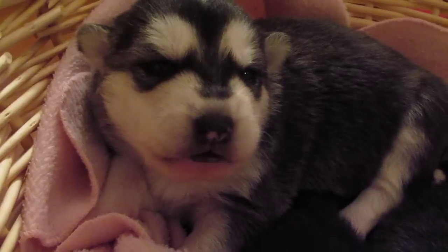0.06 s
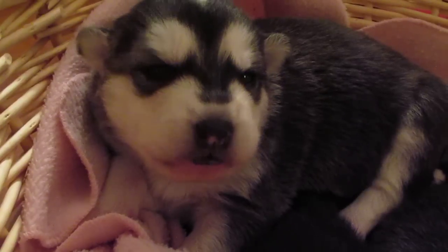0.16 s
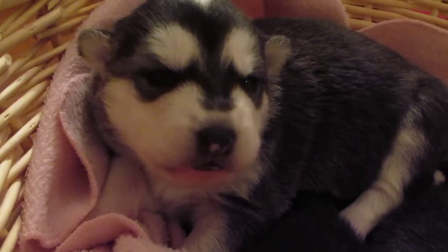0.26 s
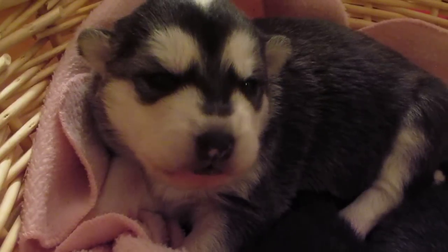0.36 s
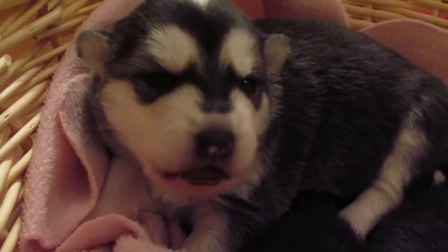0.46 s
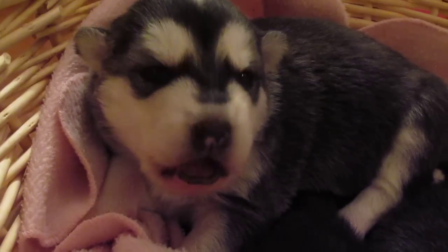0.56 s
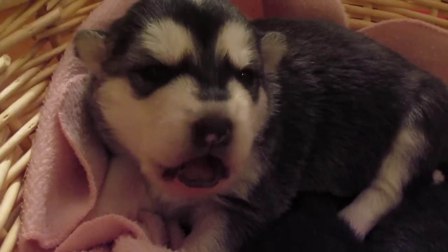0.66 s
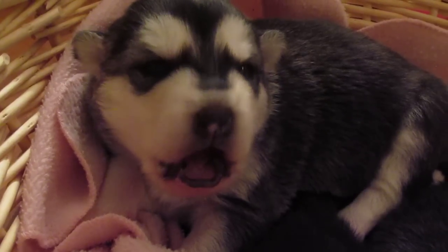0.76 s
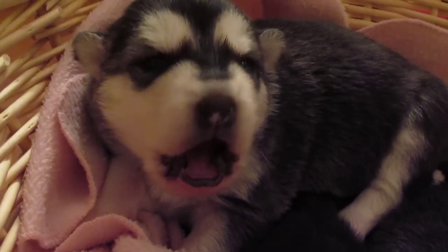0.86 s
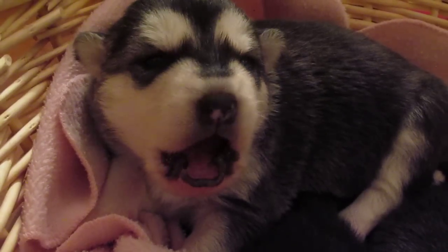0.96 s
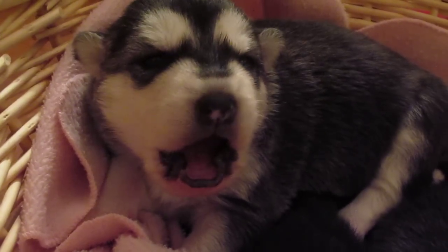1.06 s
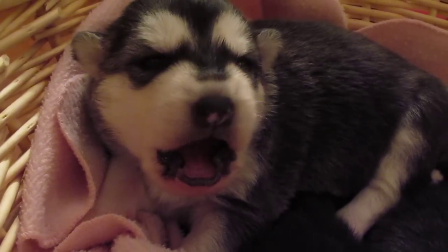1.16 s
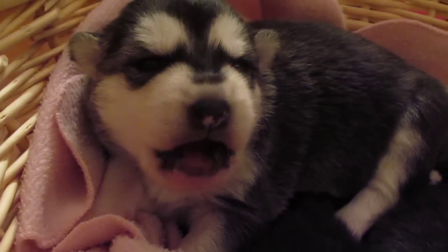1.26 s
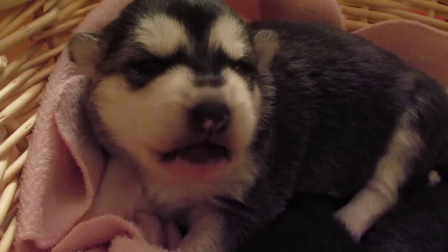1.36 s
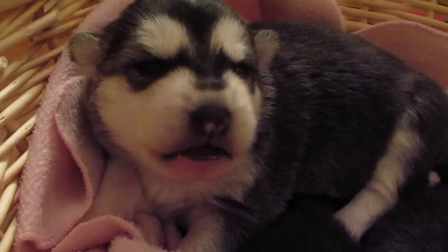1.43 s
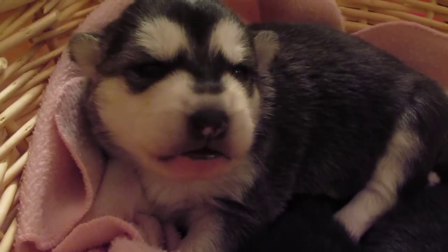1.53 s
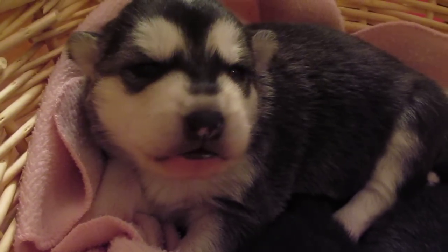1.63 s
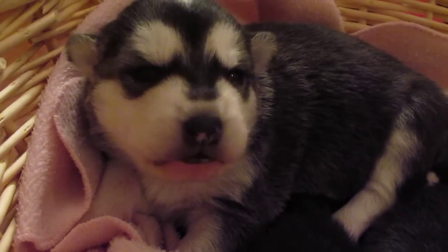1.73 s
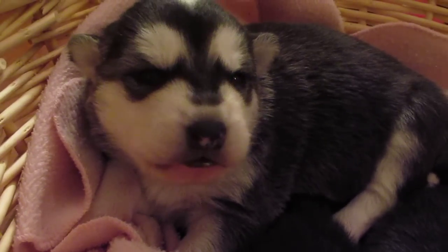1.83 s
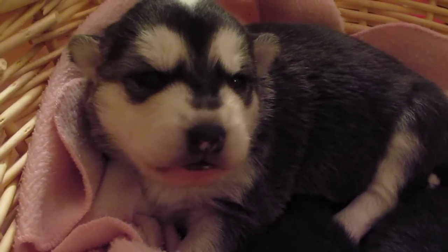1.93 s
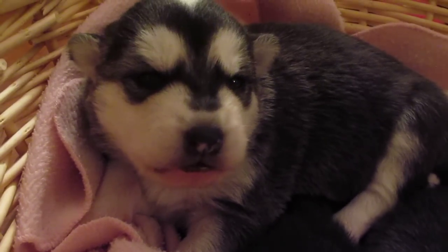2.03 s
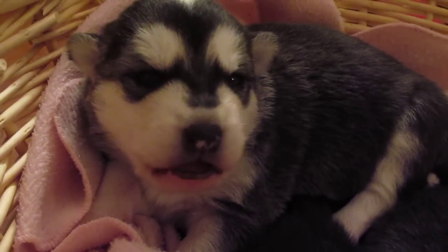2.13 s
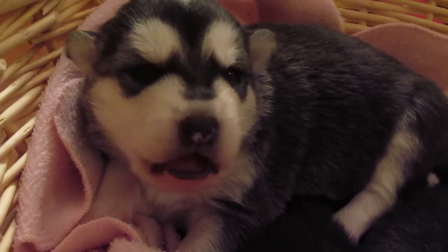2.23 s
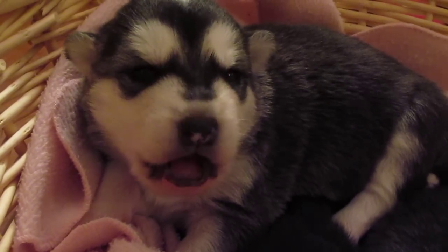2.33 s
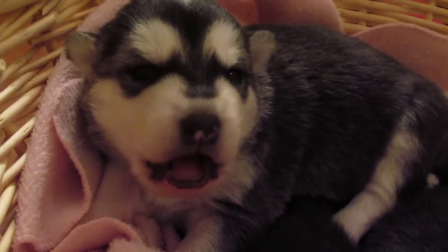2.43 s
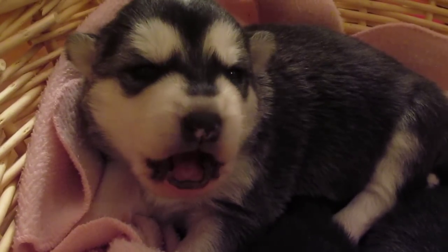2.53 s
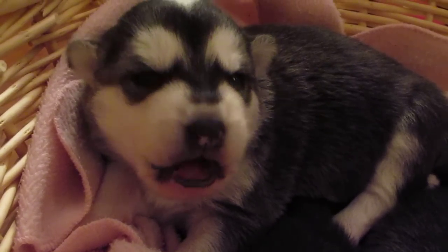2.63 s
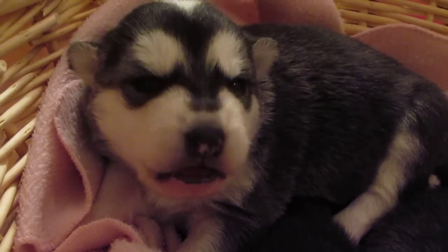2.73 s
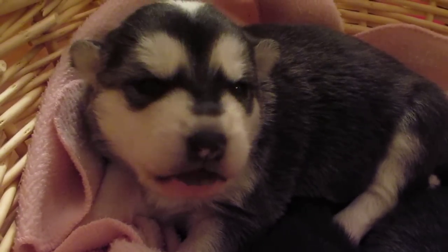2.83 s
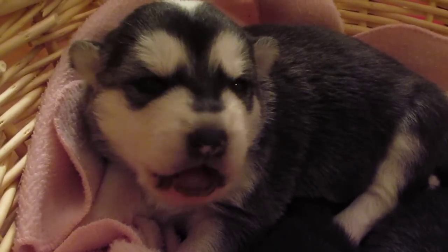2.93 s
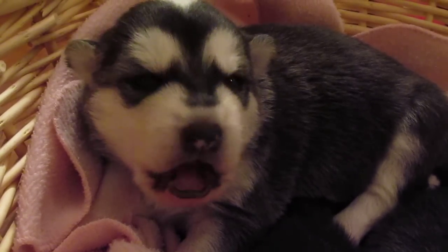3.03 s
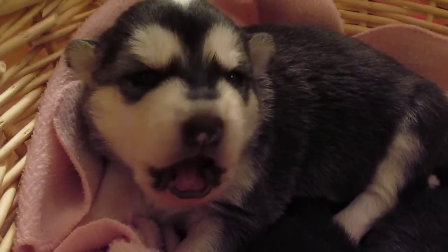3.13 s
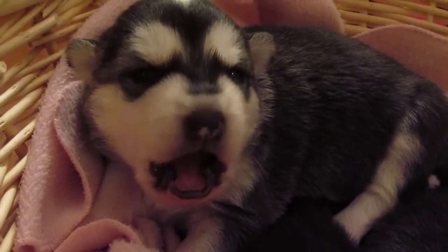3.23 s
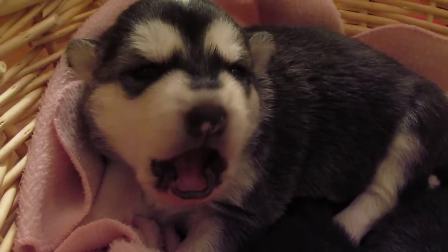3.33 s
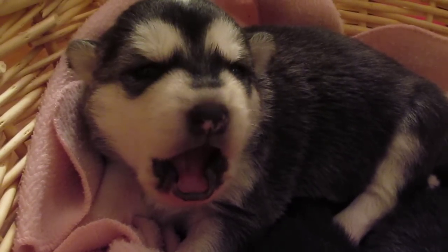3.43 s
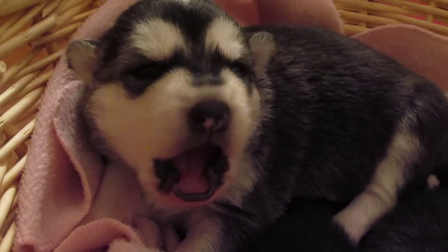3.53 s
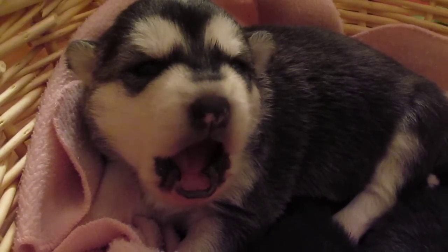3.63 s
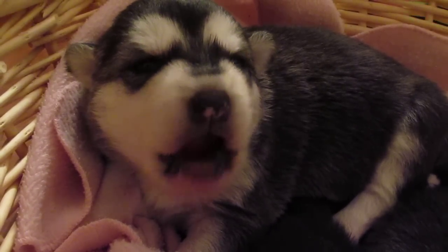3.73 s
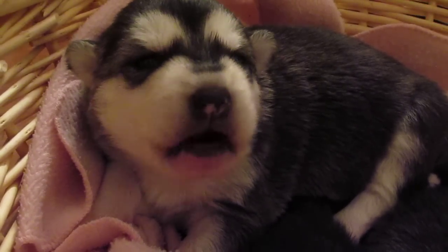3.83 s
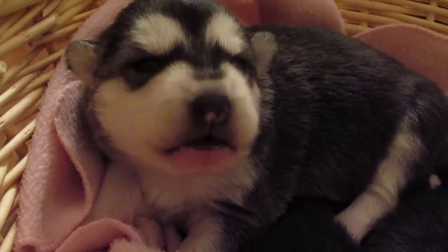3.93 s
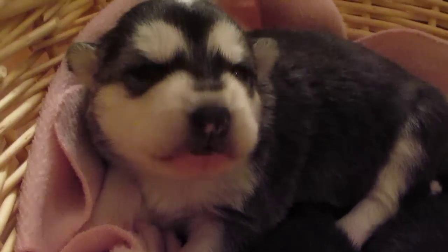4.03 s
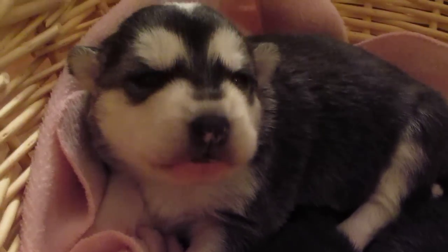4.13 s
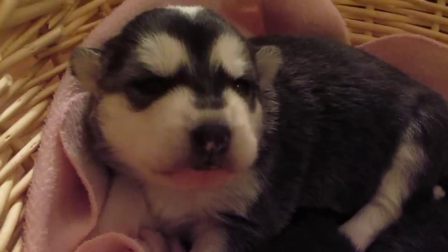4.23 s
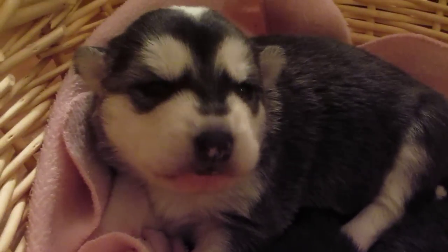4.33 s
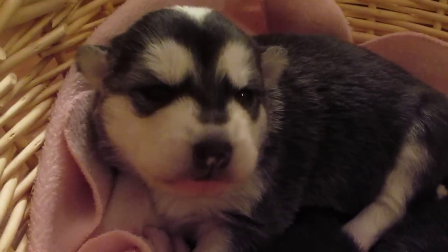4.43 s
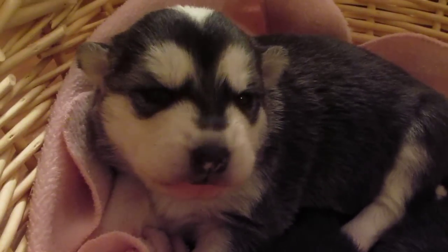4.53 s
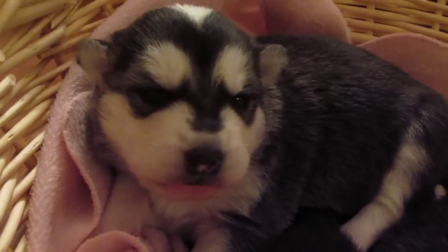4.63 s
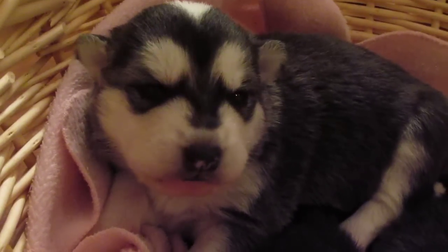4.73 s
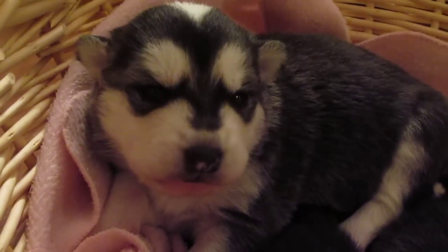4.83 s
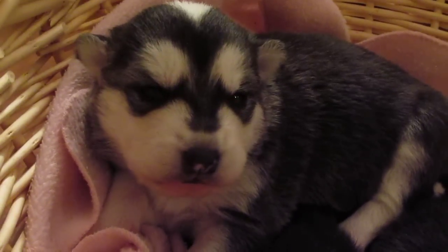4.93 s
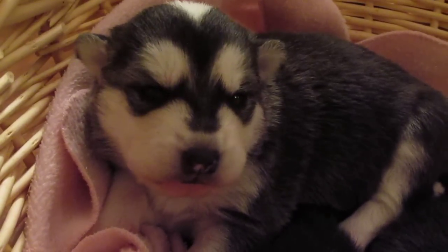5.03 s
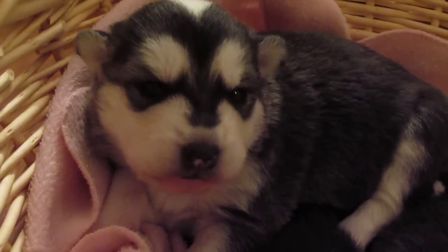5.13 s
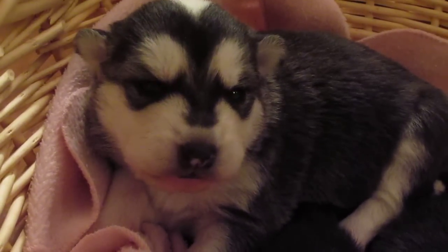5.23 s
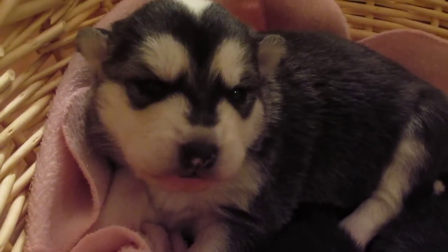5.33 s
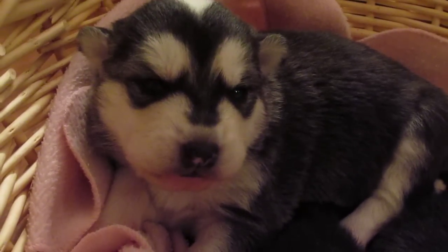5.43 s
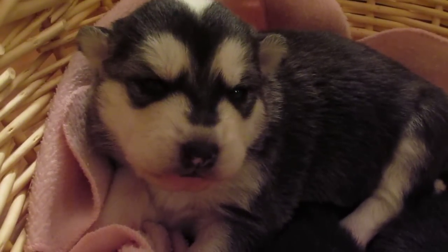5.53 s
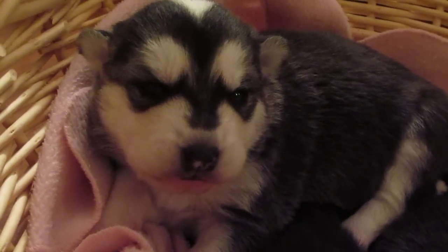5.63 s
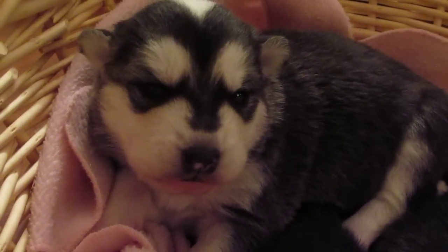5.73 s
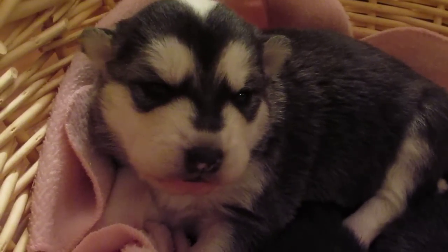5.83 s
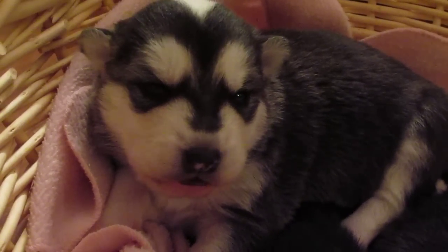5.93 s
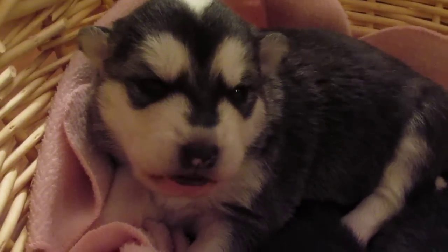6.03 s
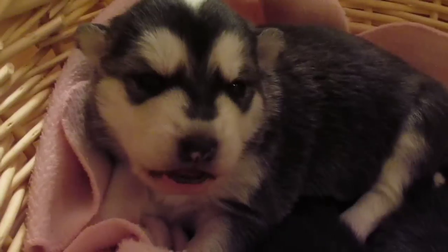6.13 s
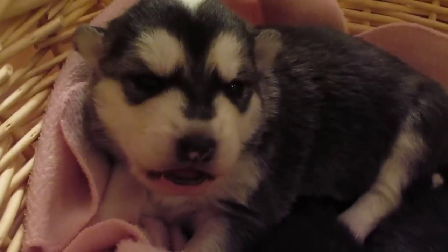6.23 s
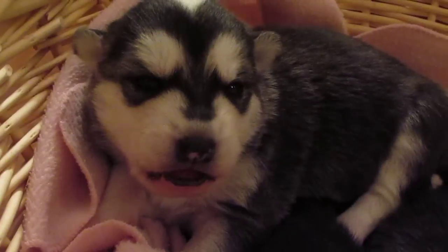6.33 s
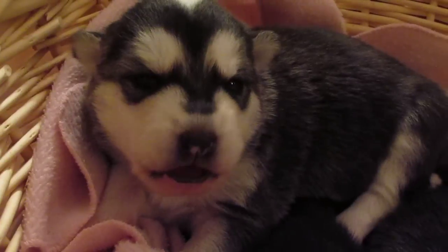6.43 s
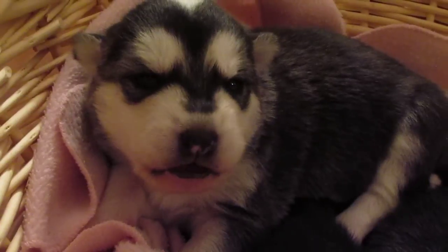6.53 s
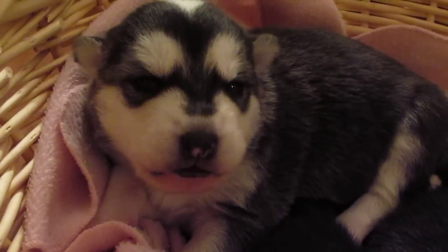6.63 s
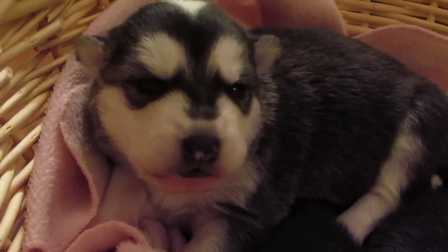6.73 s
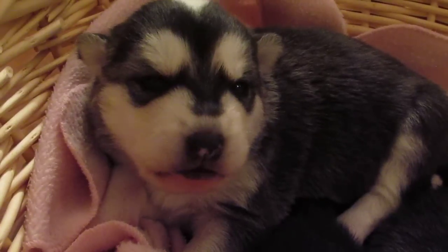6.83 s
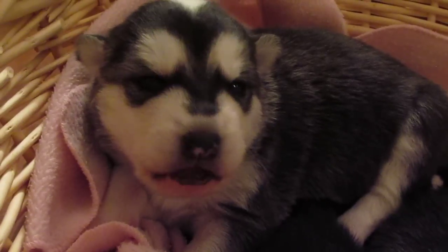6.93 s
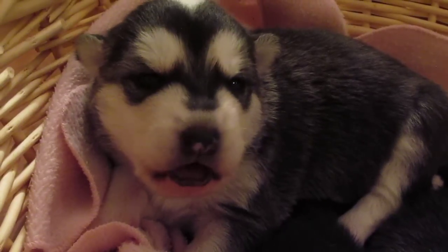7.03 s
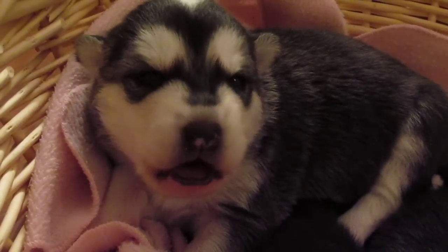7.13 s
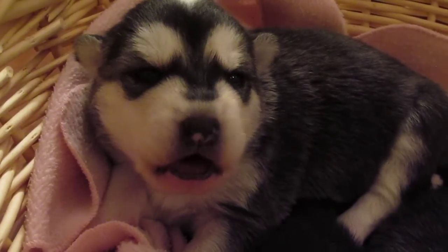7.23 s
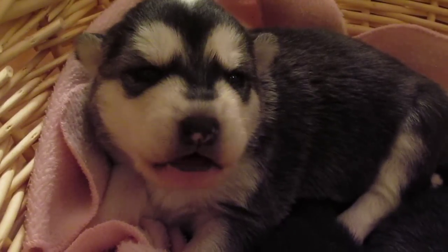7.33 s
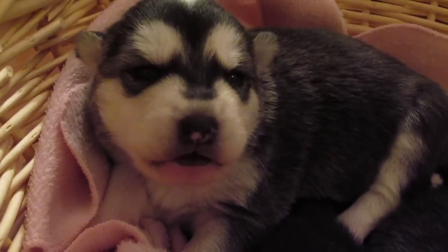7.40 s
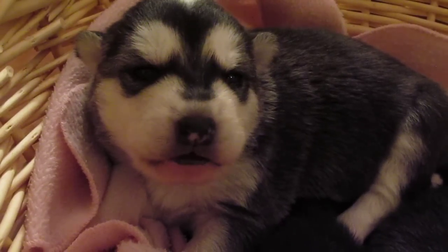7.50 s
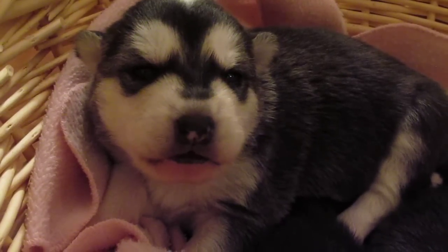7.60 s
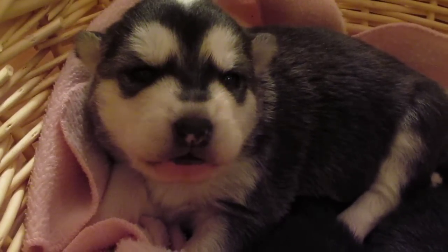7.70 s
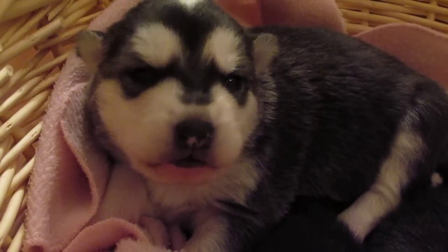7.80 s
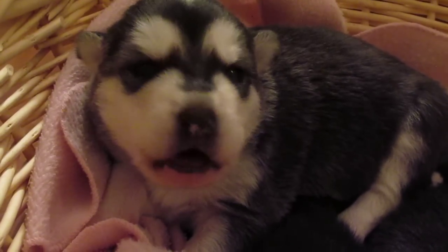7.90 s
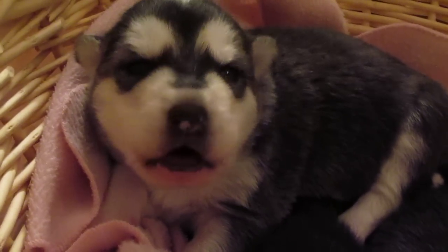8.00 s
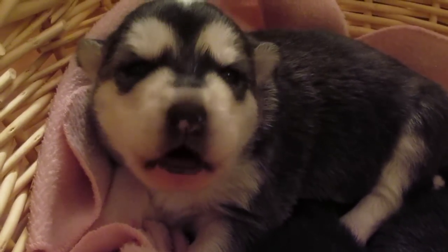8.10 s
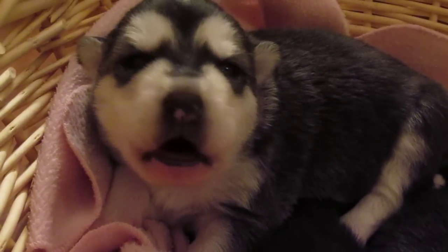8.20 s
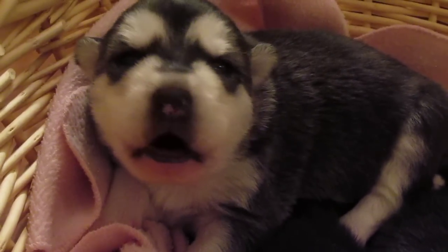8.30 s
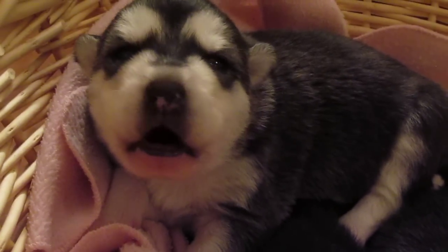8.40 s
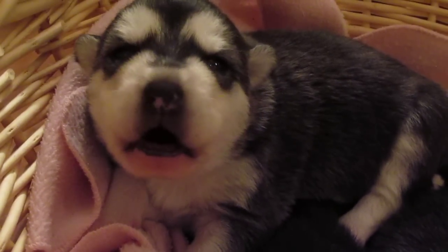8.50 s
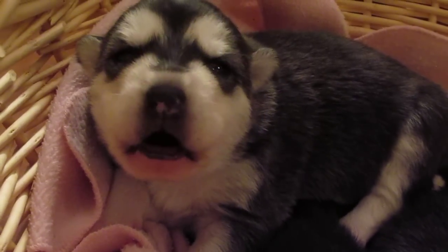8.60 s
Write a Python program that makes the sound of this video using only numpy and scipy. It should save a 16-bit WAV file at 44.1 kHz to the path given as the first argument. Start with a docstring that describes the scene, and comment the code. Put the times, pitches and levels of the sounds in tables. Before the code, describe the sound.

A very young puppy cries close to the microphone in a small, quiet furnished room, with soft air and a faint low drone. At 0 s the rasping tail of a cry falls away over a faint descending belly whine. A long wail from 0.4 to 1.7 s starts rough, arches high, then sinks and frays. A tiny thin squeak at 1.9 and a lip click at 2.0 lead to a shorter wail, 2.0-2.6. After another click, the highest, steadiest wail runs 2.8-4.2, dropping steeply near its end, with bubbling belly gurgles around 3.2. Faint croaky whimpers come at 4.5-4.7, and a low, slightly stronger one at 5.0-5.6. Wails return at 5.8-6.6 and 6.8-7.6, a small gurgle between at the second's start, while the drone swells around 6.5 and sinks. A click at 7.7 precedes a purer, more closed-mouthed cry from 7.8, cut off at 8.7.

```python
"""A young puppy in a wicker basket wails close to the microphone, in a small quiet room with a faint low drone.
It opens on the rasping end of a cry over a faint falling belly whine, then come long wails, a tiny squeak and lip
clicks, with gurgles under the third wail; short, low whimpers follow, and more wails as the drone swells and sinks.
Jittered fold pulses and hiss pass through a jaw-blended tract, rasping where the folds are slack; clicks are noise
bursts; gurgles, whine and squeak are sines; shaped noise makes the air and drone."""
import sys
import numpy as np
from scipy import signal
from scipy.fft import rfft, irfft, next_fast_len
from scipy.io import wavfile
from scipy.ndimage import uniform_filter1d, map_coordinates

SR = 44100
rng = np.random.default_rng(int(sys.argv[2]) if len(sys.argv) > 2 else 0)


def wav_out(sig):
    """Save sig, one row per channel (or a flat mono array), as 16-bit PCM at SR to the path in sys.argv[1]."""
    wavfile.write(sys.argv[1], SR, np.round(np.clip(np.atleast_2d(sig).T, -1, 1) * 32767).astype(np.int16))


N = 381906


def amp(db):
    """Decibels to gain."""
    return 10 ** (np.asarray(db) / 20)


def unit(x):
    """Scale to rms 1."""
    return x / np.sqrt(np.mean(x ** 2) + 1e-20)


def ramp(x):
    """Hold within 0 and 1."""
    return np.clip(x, 0, 1)


def bell(x, centre, width):
    """1 at the centre, falling away on both sides."""
    return np.exp(-((x - centre) / width) ** 2)


def along(points, hz):
    """(Hz, value) points read on a log frequency axis."""
    f, v = np.transpose(points)
    return np.interp(np.log(hz + 1), np.log(f + 1), v)


def curves(rows, t):
    """Each column after the time, read at the times t."""
    s, *cols = np.transpose(rows)
    return [np.interp(t, s, c) for c in cols]


def wobble(t, rate):
    """A smooth random curve, rate knots a second."""
    knots = rng.standard_normal(int((t[-1] - t[0]) * rate) + 4)
    return map_coordinates(knots, [(t - t[0]) * rate])


def filtered(x, response):
    """x times a response of frequency."""
    size = next_fast_len(x.shape[-1] + 8192)
    spectrum = rfft(x, size) * response(np.fft.rfftfreq(size, 1 / SR))
    return irfft(spectrum, size)[..., :x.shape[-1]]


def noise(spectrum, channels=2):
    """Coloured noise of rms 1."""
    white = rng.standard_normal((channels, N))
    return unit(filtered(white, lambda hz: amp(along(spectrum, hz))))


# colour of the still room air: pitch_hz, relative_level_db
AIR_COLOUR = [(20, -11.5), (45, -17.5), (90, -12), (200, -15), (500, -18), (2000, -26), (5000, -33),
              (13000, -40.5), (15500, -61)]
# swell of the low drone in the house: time_s, level_db
DRONE_SWELL = [(0, -73.5), (3.8, -79.5), (4.6, -65.5), (6.5, -53.5), (7.3, -65.5), (8.66, -62)]


def background(air_db=-57.5, side_db=-6):
    """Still room air, partly opposed between the ears, over a low centred drone of narrow noise."""
    mid, side = noise(AIR_COLOUR)
    swell_db, = curves(DRONE_SWELL, np.arange(N) / SR)
    drone_colour = [(50, -33), (75, -29), (86, 0.5), (100, -18.0), (150, -11), (300, -41.5)]
    drone = amp(swell_db) * noise(drone_colour, channels=1)[0]
    air = mid + amp(side_db) * np.array([side, -side])
    return amp(air_db) * air + drone


# how long the room rings: pitch_hz, t60_s
ROOM_DECAY = [(200, .4), (1800, .52), (5000, .3), (12000, .2)]


def room(x):
    """A noise tail that decays at its own rate in each band, the treble fastest."""
    hz, t, z = signal.stft(rng.standard_normal((2, SR // 2)), SR, nperseg=256)
    decay_db = -60 * t / along(ROOM_DECAY, hz)[:, None]
    tail = signal.istft(z * amp(decay_db), SR, nperseg=256)[1]
    return signal.fftconvolve(x[None], tail / np.linalg.norm(tail[0]), axes=1)[:, :N]


def basket(x, near_db=-19, apart_db=-19):
    """Wicker and blanket scatter the sound within milliseconds, a little differently to each microphone."""
    t = np.arange(SR // 40) / SR
    envelope = np.exp(-t / .007) * (1 - np.exp(-t / .001))
    scatter = rng.standard_normal((2, len(t))) * envelope
    shared, side = scatter / np.linalg.norm(scatter, axis=1, keepdims=True)
    side = filtered(side, lambda hz: amp(along([(400, -41.5), (1500, 5.0), (9000, 9.5)], hz)))
    paths = amp(near_db) * shared + amp(apart_db) * np.array([side, -side])
    return signal.fftconvolve(x[None], paths, axes=1)[:, :N]


# tones of the tiny squeak between two cries: pitch_hz, level_db
SQUEAK_TONES = [(1850, -54.5), (3050, -66), (4600, -66), (6880, -65.5)]


def squeak(at_s=1.895, width_s=0.02, waver=.006):
    """A few thin sine tones waver, swell and fade together."""
    t = np.arange(N) / SR
    clock = np.cumsum(1 + waver * wobble(t, rate=150)) / SR
    tones = sum(amp(db) * np.sin(2 * np.pi * hz * clock) for hz, db in SQUEAK_TONES)
    return bell(t, at_s, width_s) * tones


# belly gurgles: start_s, pitch_hz, level_db, t60_s
BELLY_GURGLES = [(2.849, 127.4, -44.5, 0.55), (2.86, 211, -42, 0.27), (3.174, 437, -27.5, 0.15),
                 (3.193, 535, -29, 0.3), (3.212, 487, -26.5, .2), (3.23, 404.5, -33.5, 0.28),
                 (3.279, 467, -38, 0.38), (3.355, 508, -32.5, 0.22), (6.795, 220.3, -30, 0.21),
                 (6.822, 239, -32, 0.25), (6.882, 227, -42, .15)]
# a faint falling whine from the belly: time_s, pitch_hz, level_db
BELLY_WHINE = [(0, 440, -50), (.3, 417, -53), (.6, 368, -61.5), (.78, 335, -57), (1, 320, -72),
               (1.1, 322, -110)]


def belly(attack_s=0.0014, waver=0.081):
    """Each gurgle is a pocket of gas ringing briefly; gas squeezing past whines."""
    gurgles = np.zeros(N + SR)
    t = np.arange(SR // 3) / SR
    for start_s, hz, db, t60 in BELLY_GURGLES:
        envelope = amp(db - 60 * t / t60) * (1 - np.exp(-t / attack_s))
        gurgles[round(start_s * SR):][:len(t)] += envelope * np.sin(2 * np.pi * hz * t)
    t = np.arange(N) / SR
    hz, db = curves(BELLY_WHINE, t)
    cycles = np.cumsum(hz * (1 + waver * wobble(t, rate=60))) / SR
    return gurgles[:N] + amp(db) * np.sin(2 * np.pi * cycles)


# lip and tongue clicks: start_s, relative_level_db
LIP_CLICKS = [(1.983, -39), (2.791, -37.5), (4.809, -63), (7.675, -41.5)]
# colour of a click: pitch_hz, relative_level_db
CLICK_COLOUR = [(150, -5), (500, -15), (1500, -7), (2700, -2), (5000, -12.5), (9000, -15.5), (14000, -33)]


def lips(t60_s=0.032, trim_db=-6):
    """Wet little clicks as the mouth parts: noise that starts at once and dies fast."""
    t = np.arange(N) / SR
    bursts = sum(amp(db - 60 * np.abs(t - s) / t60_s) * (t >= s) for s, db in LIP_CLICKS)
    return amp(trim_db) * bursts * noise(CLICK_COLOUR, channels=1)[0]


CLEAR_RASP = 0.0079  # rasp left in a clear tone, 0-1


def slackness(t, start_s, start_rasp, end_s, end_rasp):
    """The folds rasp until the breath takes hold, and fray again as it runs out."""
    catching = start_rasp * ramp(1 - ((t - t[0]) / start_s) ** 4)
    fraying = end_rasp * ramp(1 - (t[-1] - t) / end_s) ** 1.17
    return ramp(CLEAR_RASP + catching + fraying)


JAW_AT_START, JAW_OPENS_S, JAW_CLOSES_S = 0.36, 0.25, 0.27  # opening 0-1, then how long each move lasts


def jaw_opening(t, held, closes_at, final):
    """The jaw glides from its start to a held opening, then to a final one."""
    opened = JAW_AT_START + (held - JAW_AT_START) * ramp((t - t[0]) / JAW_OPENS_S)
    return ramp(opened + (final - opened) * ramp((t - closes_at) / JAW_CLOSES_S))


# resonances that ring on after each pulse: pitch_hz, width_hz
PULSE_RINGS = [(900, 230), (1700, 240), (2800, 360), (5300, 180), (8600, 600), (9700, 780)]


def ringing(hz):
    """Each resonance holds its own frequency back, spreading the pulses in time."""
    poles = [centre ** 2 - hz ** 2 + 1j * hz * width for centre, width in PULSE_RINGS]
    return np.prod([np.conj(p) / p for p in poles], axis=0)


DOUBLING = 0.32  # upper limit of the period doubling that grows with rasp
BREATHY = 0.28  # upper limit of the extra hiss that grows with rasp


def folds(t, pitch, slack, tremor=0.0043, jitter=0.15, scatter_db=3, limp=0.15, hiss_db=-37):
    """One pulse per closing of the vocal folds, with air hissing through in step."""
    hz = pitch * (1 + tremor * wobble(t, rate=170))
    cycles = np.cumsum(hz) / SR
    beat = np.arange(1, int(cycles[-1]))
    when = np.interp(beat, cycles, t)
    rasp = np.interp(when, t, slack)
    doubling = ramp(DOUBLING * np.tanh(2.06 * rasp))
    chance = rng.standard_normal((2, len(beat)))
    # slack folds close alternately strong and weak, with random timing and force on top
    odd = doubling * (-1) ** beat
    when = when + (limp * odd + jitter * rasp * chance[0]) / np.interp(when, t, hz)
    size = (1 + odd) * amp(scatter_db * rasp * chance[1])
    # windowed sincs set each pulse between samples
    place = (when[:, None] - t[0]) * SR
    taps = np.floor(place) + np.arange(-7, 9)
    shape = np.sinc(taps - place) * np.cos(np.pi * (taps - place) / 16) ** 2
    index = np.clip(taps, 0, len(t) - 1).astype(int)
    pulses = np.bincount(index.ravel(), (size[:, None] * shape).ravel(), len(t))
    hiss = unit(rng.standard_normal(len(t)) * (1 + np.cos(2 * np.pi * cycles)))
    hiss_colour = [(500, -3), (2000, -2), (5000, 20.5), (10000, 17.0)]
    hiss = filtered(hiss, lambda f: amp(along(hiss_colour, f)))
    source = unit(pulses) + (amp(hiss_db) + BREATHY * np.tanh(3 * slack)) * hiss
    # the slackest voice breaks up into croaks
    source = source * amp(8 * slack ** 2 * wobble(t, rate=120))
    # ring the pulses and thin out everything below about 170 Hz
    return filtered(source, lambda f: ringing(f) * f ** 4 / (f ** 4 + 170 ** 4))


# the fundamental: rise per octave of pitch, loss with the jaw open, most that it exceeds the main resonance
LOW_OCTAVE_DB, LOW_JAW_DB, LOW_LEAD_DB = 7, 5, 8
LOW_DIP_HZ, LOW_DIP_WIDTH_HZ, LOW_DIP_DB = 790, 126, 10  # with the mouth open it sinks crossing a notch
LOW_FADE_S, LOW_FADE_DB = 0.031, 3  # it sinks as the breath runs out


def fundamental(t, cry_db, main_db, hz, jaw):
    """Level of the fundamental: stronger at high pitch and with the jaw shut."""
    db = cry_db + LOW_OCTAVE_DB * np.log2(hz / 800) - LOW_JAW_DB * jaw  # 800 Hz: a typical cry
    db = db - LOW_DIP_DB * np.sqrt(jaw) * bell(hz, LOW_DIP_HZ, LOW_DIP_WIDTH_HZ)
    db = db - LOW_FADE_DB * ramp(1 - (t[-1] - t) / LOW_FADE_S)
    return np.minimum(db, main_db + LOW_LEAD_DB)


# the vocal tract with the jaw open and shut: pitch_hz, relative_level_db
OPEN_TRACT = [(270, -22.5), (600, -18), (1100, -13), (1350, -6), (1650, -3.5), (2100, 6.5), (2550, 2),
              (2850, -2.5), (3300, -18.5), (3800, -4), (4300, -17.5)]
SHUT_TRACT = [(270, 1), (500, -1.5), (900, 6.5), (1250, -6.5), (1650, -1), (2000, -18), (2400, -32),
              (3000, -27.5), (3600, -43), (4300, -50)]
# short cavities of the muzzle, sounding through the mouth or the nose: pitch_hz, relative_level_db
MOUTH_CAVITIES = [(4450, -17.5), (5100, -6), (6100, -16), (6900, -27.5), (7900, -15), (8600, -8),
                  (9500, -17), (10700, -21), (11600, -36), (12800, -31.5), (13800, -52.5), (15500, -67.5)]
NOSE_CAVITIES = [(4600, -37), (5400, -32.5), (6100, -36.5), (6900, -37), (7900, -20), (8600, -12),
                 (9500, -8), (10600, -22), (11400, -37), (12300, -35.5), (13800, -51.5), (15500, -64)]
# edges of the fundamental, main resonance, upper resonance and treble: edge_hz
ZONE_EDGES = [0, 1320, 2650, 4300, 22050]


def tract(source, t, opening, levels):
    """The jaw blends two tract shapes; each zone of the voice is then brought to its level."""
    hz, s, z = signal.stft(source, SR, nperseg=512, noverlap=448)
    jaw = np.interp(t[0] + s, t, opening)
    open_db = np.outer(along(OPEN_TRACT + MOUTH_CAVITIES, hz), jaw)
    shut_db = np.outer(along(SHUT_TRACT + NOSE_CAVITIES, hz), 1 - jaw)
    z = z * amp(open_db + shut_db)
    # differences of steep low-passes give one band per zone
    under = [1 / (1 + (hz / (edge + 1e-3)) ** 40) for edge in ZONE_EDGES]
    gain = 0
    for zone, level in zip(np.diff(under, axis=0), levels):
        db = np.interp(t[0] + s, t, level)
        power = uniform_filter1d(zone @ np.abs(z) ** 2, size=9) * 4 / 3
        gain = gain + np.outer(zone, amp(db) / np.sqrt(np.abs(power) + 1e-14))
    return signal.istft(z * gain, SR, nperseg=512, noverlap=448)[1][:len(t)]


# pitch arch, one list per cry: time_s, pitch_hz
CRY_PITCH = [
    [(0, 582), (.03, 484.5), (.06, 420), (.095, 408.2), (.14, 315.5)],
    [(0.41, 522), (0.462, 750.6), (0.524, 810.4), (0.566, 948.6), (0.62, 967.7), (0.69, 1084), (0.82, 1159),
     (0.936, 1058), (1.08, 875), (1.194, 685), (1.29, 679), (1.36, 603.5), (1.39, 607), (1.464, 521.3),
     (1.532, 532), (1.624, 452.0), (1.654, 519), (1.69, 484)],
    [(2.036, 479.4), (2.046, 515.5), (2.058, 560), (2.086, 637), (2.11, 700), (2.17, 838), (2.23, 926),
     (2.28, 993), (2.464, 1105), (2.554, 1015), (2.562, 957), (2.58, 789), (2.605, 594)],
    [(2.815, 492), (2.851, 721.9), (2.871, 827), (2.917, 997), (2.961, 1155), (3.079, 1249), (3.269, 1272),
     (3.561, 1216), (3.781, 1231), (3.829, 1179), (3.909, 855), (3.961, 776), (3.981, 698), (4.011, 575.4),
     (4.129, 511.6), (4.151, 548), (4.175, 499.3)],
    [(4.488, 543), (4.532, 505)],
    [(4.546, 501), (4.58, 468.6), (4.7, 516)],
    [(5.04, 601.5), (5.09, 500.6), (5.137, 528.3), (5.18, 444.5), (5.28, 434.3), (5.312, 520.7),
     (5.377, 494), (5.45, 543.5), (5.555, 484)],
    [(5.795, 501), (5.819, 543.4), (5.855, 701), (5.859, 715), (5.909, 715), (5.999, 803), (6.093, 887.3),
     (6.151, 850), (6.251, 817), (6.317, 820), (6.399, 946.6), (6.465, 907), (6.505, 810), (6.515, 734),
     (6.535, 599.4), (6.57, 513)],
    [(6.8, 616), (6.814, 694.4), (6.856, 794.6), (6.898, 815), (6.95, 946), (7.028, 956), (7.084, 1001),
     (7.144, 1010), (7.176, 1050), (7.252, 978.4), (7.33, 819.5), (7.402, 724), (7.466, 706), (7.498, 618),
     (7.598, 540.6), (7.615, 535)],
    [(7.828, 559.4), (7.888, 890.4), (7.924, 921), (7.938, 1002), (7.998, 1148), (8.038, 1166),
     (8.252, 1052), (8.416, 1006), (8.424, 989), (8.592, 925.5), (8.648, 865), (8.66, 855)],
]
# one row per cry: rough_start_s, start_rasp (0-1), frayed_end_s, end_rasp (0-1), held_jaw (0-1),
# jaw_leaves_hold_s, final_jaw (0-1), fundamental_db (at 800 Hz, jaw shut, before notch, fade and ceiling)
CRY_SHAPES = [ (0.079, .3, 0.13, .7, 0.2, 0.089, 0.3, -23.5), (0.046, .8, .32, 0.6, 0.87, 1.19, 0.48, -28),
              (.06, 0.6, .03, 0.6, 0.76, 2.5, 0.2, -28.5), (.055, 0.3, 0.15, .55, 0.94, 3.715, 0.21, -30),
              (0.049, .7, .04, 0.8, .1, 4.1, 0, -38), (0.22, .9, 0.15, 1, .1, 4.2, 0, -33.5),
              (0.3, .45, .17, 0.9, .2, 5.3, 0.25, -27.5), (.05, 0.3, .04, 1, 0.58, 6.29, 0.01, -25.5),
              (.03, 0.6, 0.096, .45, 0.72, 6.974, 0, -27.5), (.05, .2, .02, .02, 0.2, 7.75, 0, -22.5), ]
# level path, one list per cry: time_s, main_resonance_db, upper_resonance_db, treble_db
CRY_LOUDNESS = [
    [(0.0, -18, -37, -33.5), (0.108, -30.5, -53, -39.5), (0.116, -38, -59, -56), (0.14, -39, -45, -50)],
    [(0.409, -21, -46, -41.5), (0.419, -28.5, -30.5, -25.5), (0.455, -12.5, -25, -23.5),
     (0.523, -11, -34, -26), (0.555, -15.5, -24, -23.5), (0.839, -14, -23.5, -24), (0.917, -13.5, -30, -23),
     (1.015, -10.5, -25, -26), (1.071, -17.5, -22, -27.5), (1.117, -23, -38, -31), (1.307, -19.5, -34, -33),
     (1.375, -21, -42, -31), (1.425, -20.5, -37, -30), (1.645, -30, -50, -38), (1.69, -40, -54, -49)],
    [(2.036, -34, -39, -44), (2.066, -26.5, -33, -25.5), (2.132, -16, -23, -25), (2.168, -12.5, -33, -18),
     (2.222, -15.5, -19, -23.5), (2.456, -18.5, -26.5, -21), (2.564, -11.5, -23, -23),
     (2.584, -20, -40, -31), (2.605, -18, -41, -43)],
    [(2.815, -34, -43, -38.5), (2.879, -13.5, -25.5, -21), (2.905, -16.5, -16.5, -20),
     (2.951, -22, -27.5, -25), (3.071, -18, -16, -20), (3.311, -15.5, -21, -29.5), (3.583, -17, -17.5, -23),
     (3.719, -12.5, -26, -22.5), (3.795, -23.5, -32.5, -36.5), (3.845, -20, -43, -34),
     (3.893, -17, -35, -34), (3.931, -17.5, -52, -37), (4.003, -29.5, -54, -44), (4.147, -38, -61, -43.5),
     (4.175, -45, -72, -53)],
    [(4.488, -77.5, -87, -66), (4.502, -51.5, -79, -62.5), (4.532, -53.5, -82, -59)],
    [(4.546, -51.5, -74, -55), (4.642, -39.5, -76, -50), (4.682, -44, -72.5, -49.5), (4.7, -61, -83, -52.5)],
    [(5.04, -60, -76.5, -65), (5.058, -41.5, -71, -50.5), (5.156, -37.5, -60, -44),
     (5.248, -35, -65, -48.5), (5.414, -33, -58, -35.5), (5.53, -37, -61, -43), (5.555, -49, -77, -52)],
    [(5.795, -56, -68, -65), (5.803, -38.5, -56, -43.5), (5.893, -22, -41, -34.5), (6.047, -14.5, -36, -20),
     (6.095, -13.5, -21, -21), (6.171, -19.5, -32.5, -22), (6.339, -13, -31, -20.5),
     (6.371, -15.5, -19.5, -22.5), (6.483, -14, -35.5, -33.5), (6.561, -25.5, -52, -37),
     (6.57, -42, -61, -51)],
    [(6.8, -30.5, -46, -36.5), (6.81, -26.5, -42, -34.5), (6.902, -10.5, -35, -21),
     (6.928, -16, -18.5, -22), (7.01, -14.5, -20.5, -21), (7.13, -12.5, -31.5, -30.5),
     (7.186, -29.5, -35.5, -36), (7.288, -28, -41, -38), (7.326, -15.5, -54, -38.5), (7.464, -27, -62, -46),
     (7.522, -34.5, -49, -34), (7.604, -28.5, -56, -39), (7.615, -37, -70, -48)],
    [(7.828, -26, -36.5, -32), (7.872, -9, -32, -27.5), (7.896, -15.5, -15.5, -30.5), (7.92, -10, -35, -35),
     (7.938, -29.5, -29, -40), (8.0, -30, -53.5, -33.5), (8.334, -30, -56, -34), (8.412, -31, -36, -36),
     (8.546, -28, -30, -39.5), (8.626, -28.5, -34.5, -37), (8.66, -19, -53, -37.5)],
]
ATTACK_S, RELEASE_S = 0.0097, 0.011  # the voice switches on and off


def puppy(shimmer_db=0.91):
    """The cries, one after another: fold pulses through the moving tract, with a slight level shimmer."""
    out = np.zeros(N + SR)
    for cry, pitch, loudness in zip(CRY_SHAPES, CRY_PITCH, CRY_LOUDNESS):
        start_s, start_rasp, end_s, end_rasp, held, closes_at, final, low_db = cry
        at = np.arange(max(0, round(loudness[0][0] * SR)), round(loudness[-1][0] * SR))
        t = at / SR
        hz, = curves(pitch, t)
        jaw = jaw_opening(t, held, closes_at, final)
        source = folds(t, hz, slackness(t, start_s, start_rasp, end_s, end_rasp))
        main_db, upper_db, treble_db = curves(loudness, t)
        levels = fundamental(t, low_db, main_db, hz, jaw), main_db, upper_db, treble_db
        voiced = ramp((t - t[0]) / ATTACK_S) * ramp((t[-1] - t) / RELEASE_S)
        shimmer = amp(shimmer_db * wobble(t, rate=78))
        out[at] += voiced * shimmer * tract(source, t, jaw, levels)
    return out[:N]


def scene():
    """The puppy lies just right of centre; the furnished room answers mostly below the treble."""
    near = puppy() + squeak() + lips() + belly()
    answer_colour = [(500, -23), (1800, -23.5), (5000, -32), (10000, -35)]
    answer = filtered(room(near), lambda hz: amp(along(answer_colour, hz)))
    lean = amp([[-.4], [.4]])  # left, right
    return near * lean + basket(near) + answer + background()


def record(dry, top_hz=15720):
    """Nothing is kept above the band limit."""
    return filtered(dry, lambda hz: hz < top_hz)


dry = scene()
out = record(dry)
wav_out(out)
```